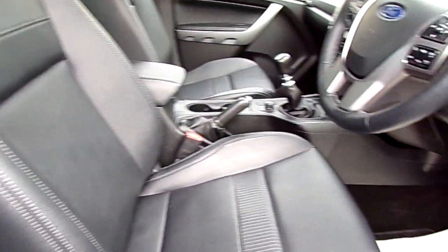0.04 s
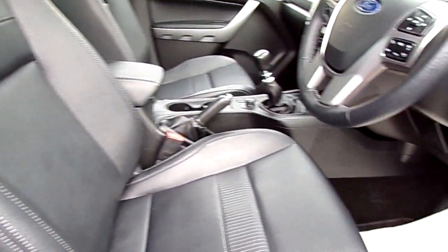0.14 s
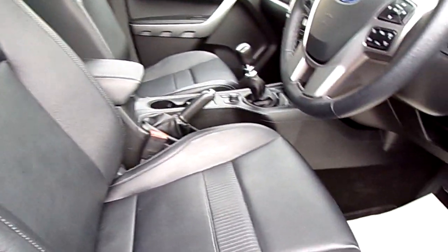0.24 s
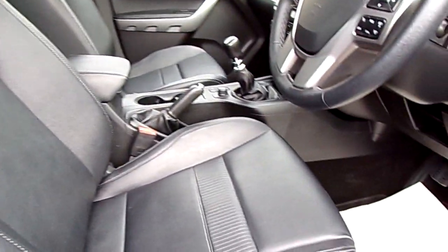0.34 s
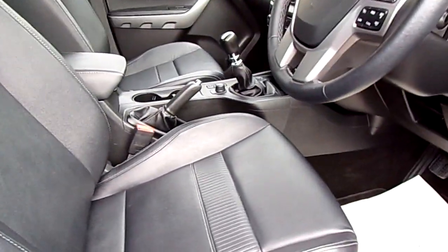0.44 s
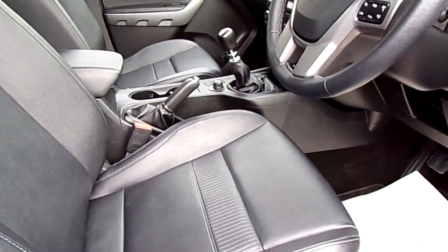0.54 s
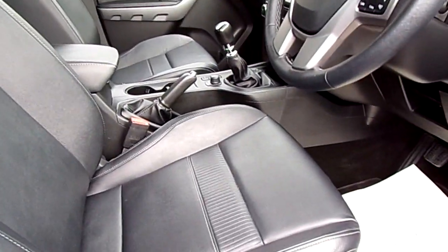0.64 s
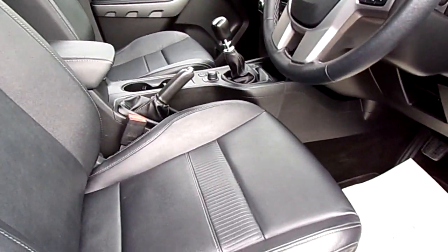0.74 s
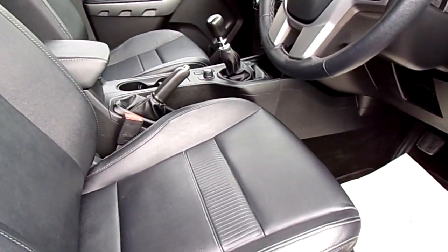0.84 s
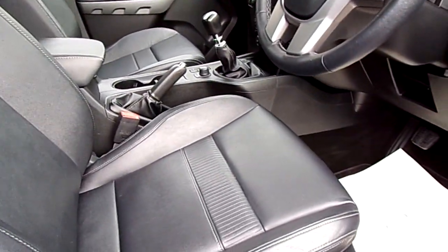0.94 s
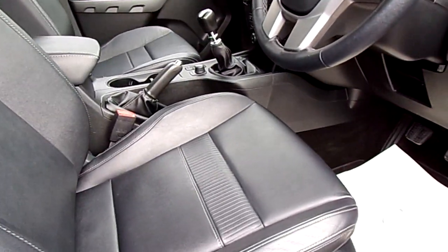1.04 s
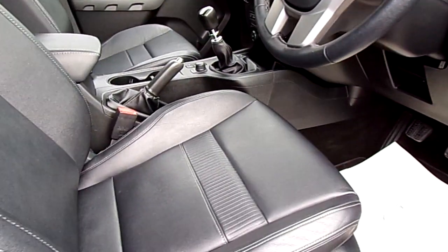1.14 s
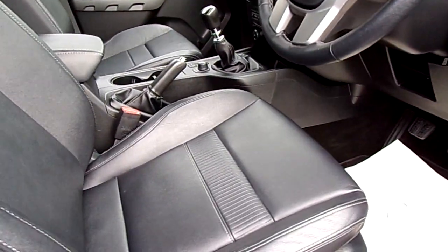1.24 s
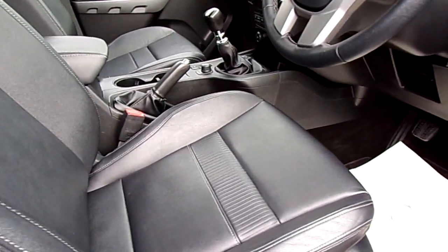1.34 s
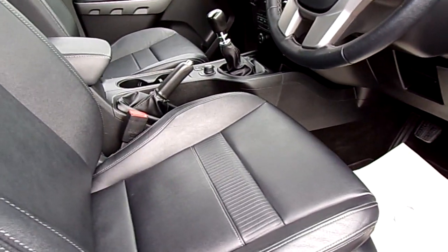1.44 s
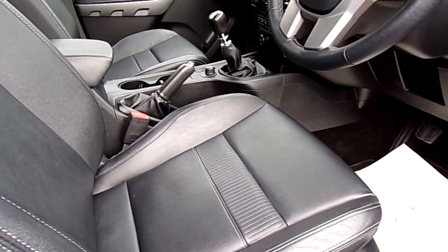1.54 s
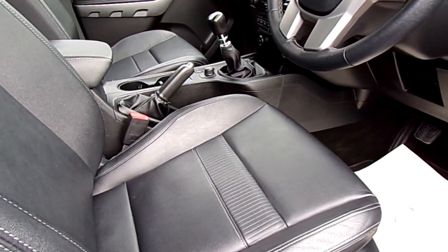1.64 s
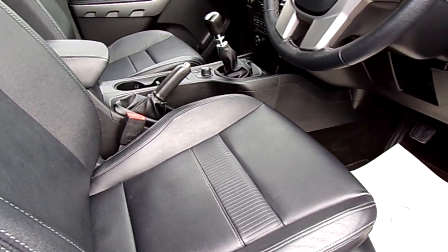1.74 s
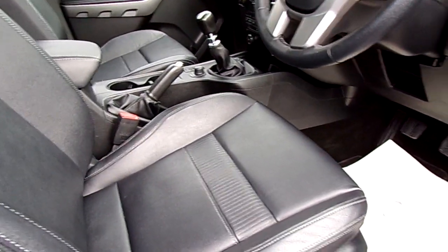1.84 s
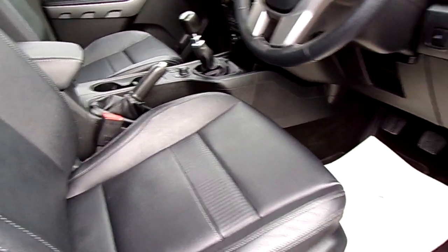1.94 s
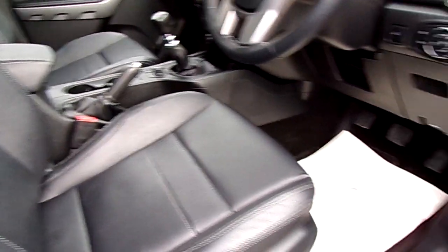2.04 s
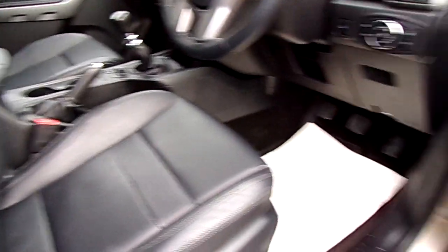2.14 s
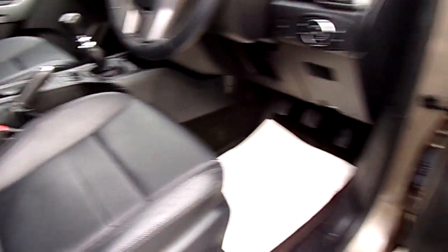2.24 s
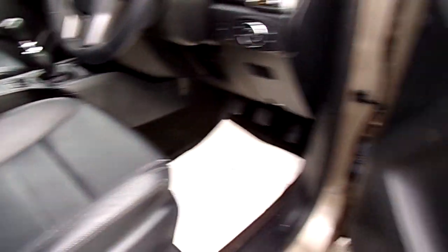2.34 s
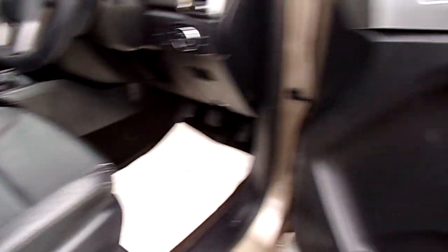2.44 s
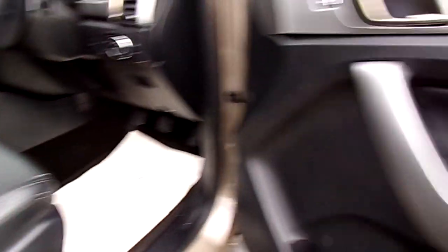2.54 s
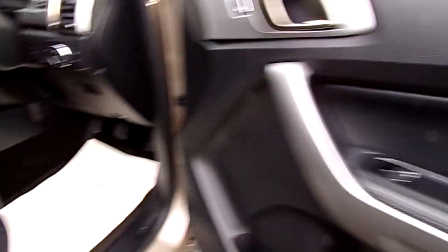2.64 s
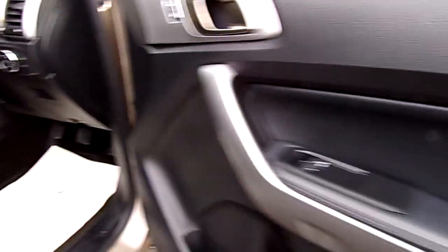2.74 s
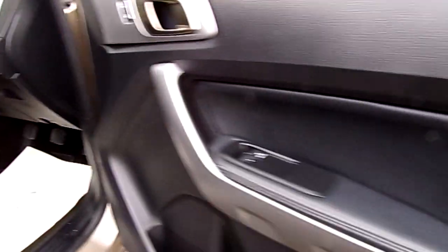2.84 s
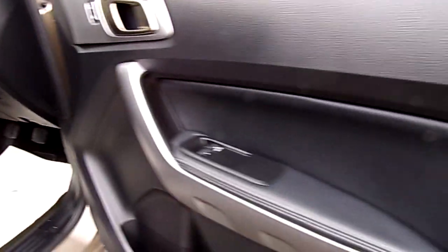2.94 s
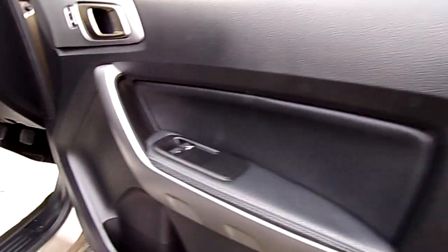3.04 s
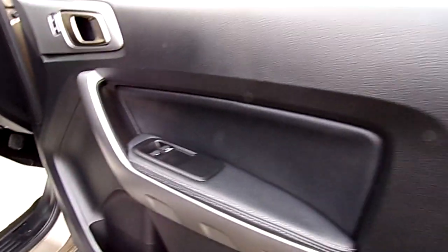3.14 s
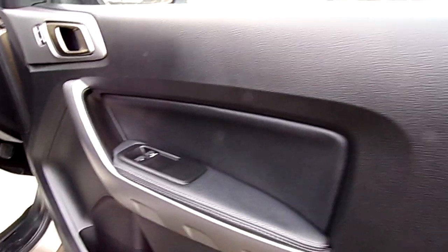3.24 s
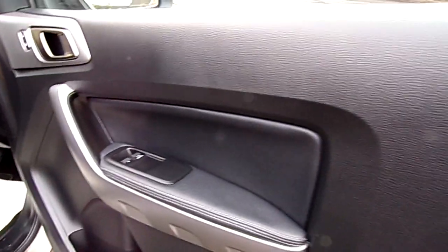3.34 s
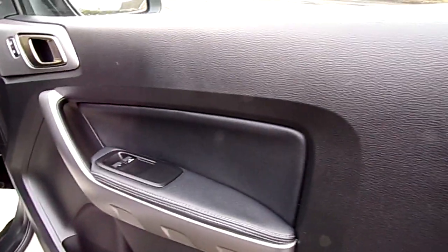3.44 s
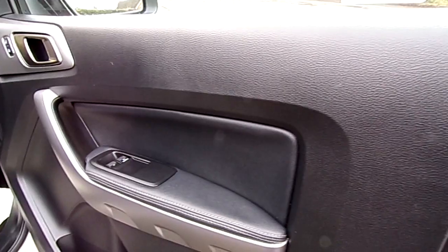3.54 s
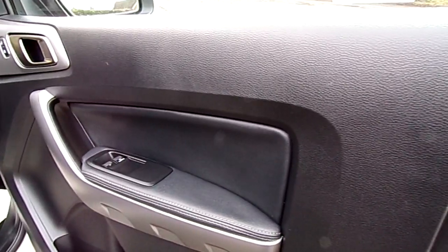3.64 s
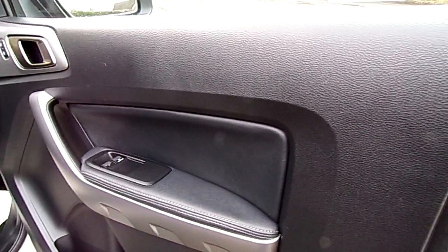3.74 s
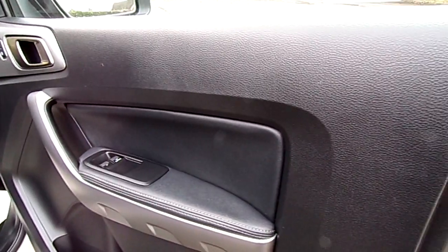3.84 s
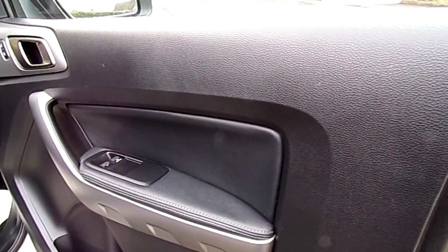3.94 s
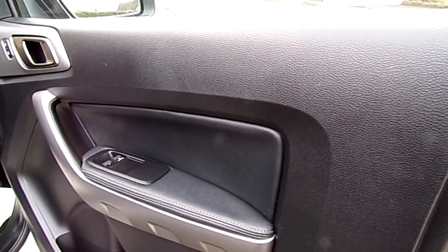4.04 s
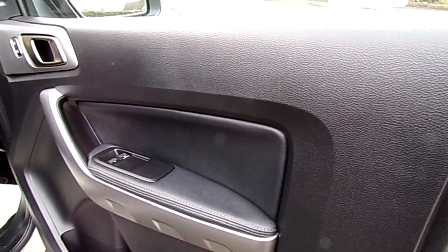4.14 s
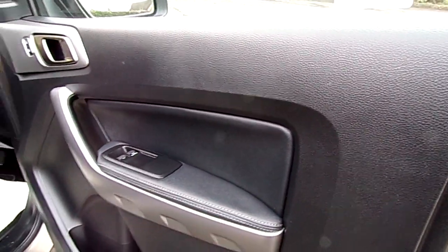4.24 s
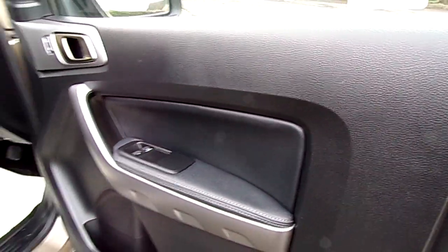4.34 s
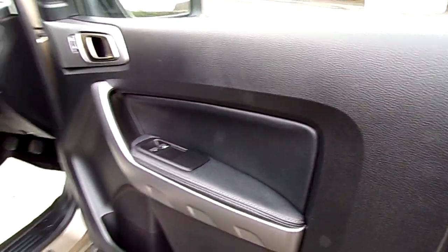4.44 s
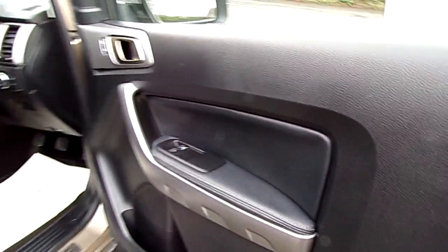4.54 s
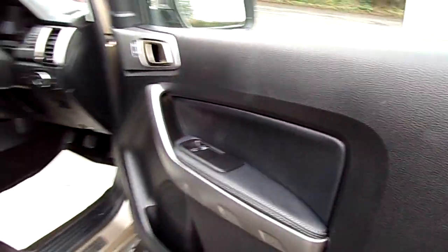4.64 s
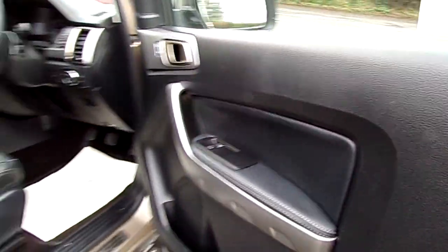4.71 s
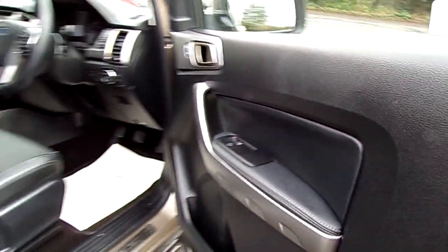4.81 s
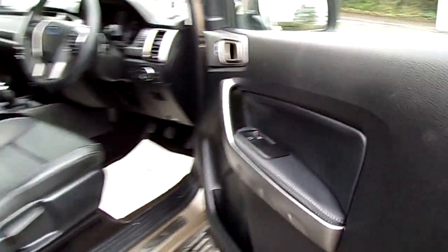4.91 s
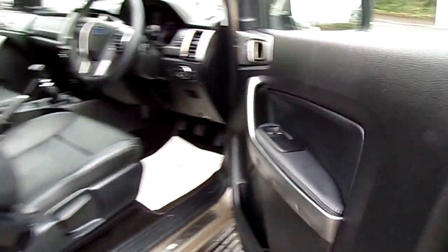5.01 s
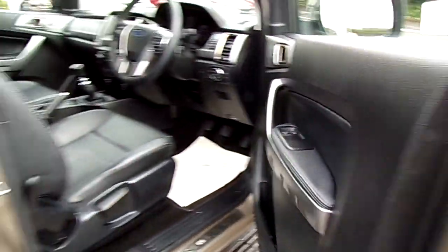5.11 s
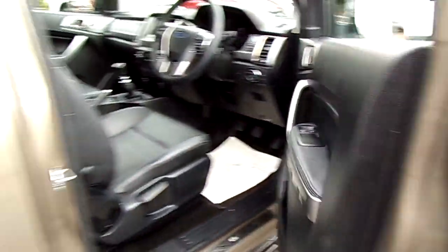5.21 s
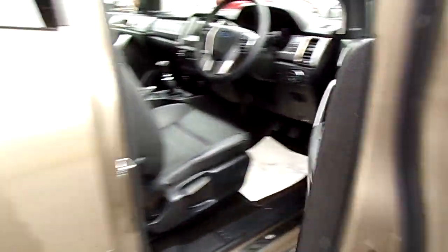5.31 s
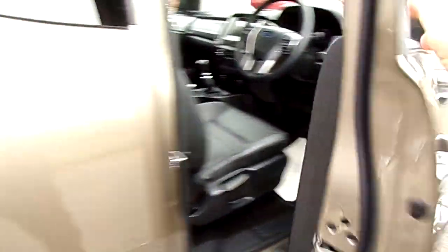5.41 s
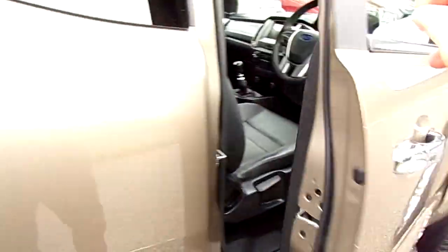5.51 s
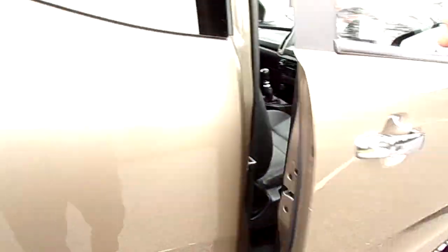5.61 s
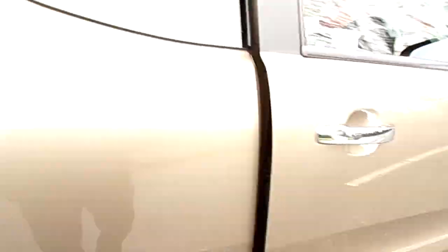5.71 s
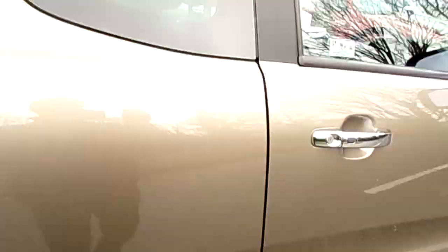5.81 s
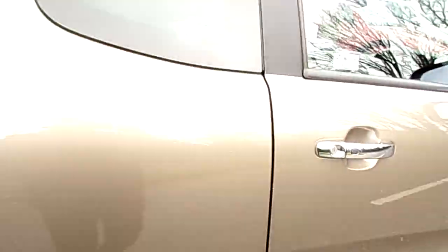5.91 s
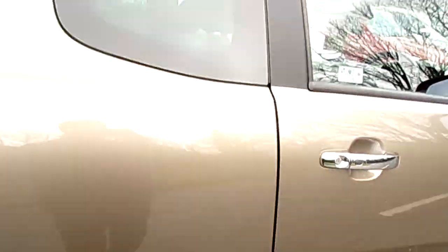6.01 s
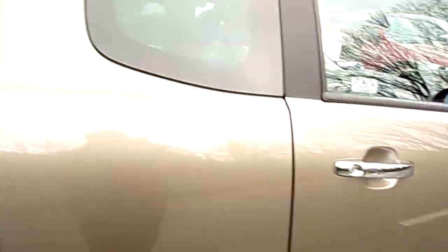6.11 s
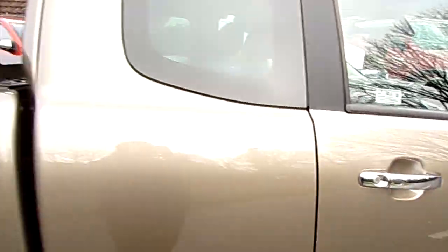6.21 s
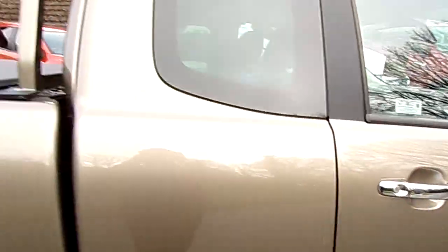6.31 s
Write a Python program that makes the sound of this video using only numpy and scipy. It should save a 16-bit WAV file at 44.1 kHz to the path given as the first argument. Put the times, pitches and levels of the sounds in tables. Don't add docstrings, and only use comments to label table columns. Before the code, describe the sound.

Heavy vehicle door slam with rattling trim, quiet open lot, small ticks and distant birds, an approaching car's rushing roar, another tighter slam near the end.

```python
import sys
import numpy as np
from scipy import signal
from scipy.fft import rfft, irfft, next_fast_len
from scipy.io import wavfile
from scipy.ndimage import uniform_filter1d

SR = 44100
rng = np.random.default_rng(int(sys.argv[2]) if len(sys.argv) > 2 else 0)


def how_loud(loudness_db):
    steps = np.asarray(loudness_db, float) / 20
    return 10 ** steps


def wav_record(signal):
    frames = np.transpose(np.atleast_2d(signal))
    bounded = np.clip(frames, -1, 1)
    quanta = np.round(bounded * 32767).astype(np.int16)
    wavfile.write(sys.argv[1], SR, quanta)


N = 280917
BINS = np.fft.rfftfreq(512, 1 / SR)
FRAMES = np.arange(N // 128 + 6) * 128 / SR

# pitch_hz, level_db (per Hz)
LOT_SPECTRUM = [(25, -29.5), (60, -7), (145, 1), (220, -4), (430, -13.5), (585, -10), (655, -15.5),
                (760, -9), (975, -9), (1170, -12.5), (2490, -14.5), (2860, -15), (4000, -16.5),
                (6000, -40.5)]
# pitch_hz, level_db (rms)
MACHINE_HUM = [(59.2, -72)]
# pitch_hz, level_db
HEDGE_SPECTRUM = [(3000, -31), (4300, 0), (5500, 1), (6500, 2.5), (7500, -4.5), (10000, -8.5), (13000, -28)]
# middle_s, length_s, level_db
HEDGE_GUSTS = [
    (.25, 0.58, -59),
    (1.11, 0.42, -59),
    (1.88, 0.89, -65),
    (2.78, 0.91, -58),
    (4.0, 0.63, -60.5),
    (5.25, 0.42, -59),
    (5.9, 2, -58.5),
]
# centre_hz, width_hz, depth_db
PORT_DIPS = [(3682, 95, 28), (4378, 180, 28), (8045, 210, 27), (11720, 330, 20)]
# pitch_hz, level_db
PORT_ROLL_OFF = [(6800, 0), (7300, -8), (7800, -15), (9200, -12.5), (11000, -25.5), (16000, -35)]
# pitch_hz, delay_ms
BASS_LAG = [(300, 3.99), (1000, 3.3), (2000, 2.83), (3500, 0.29), (6000, 0.051)]
# pitch_hz, level_db
HISS_SPECTRUM = [(7000, -2.5), (9000, -18), (11000, -15), (13000, -8), (15700, -2)]
# middle_s, length_s, level_db, extra_band_db
HISS_SWELLS = [(.2, .9, 3.5, 6), (1.55, 1.4, 3, -1), (2.95, 1.3, 3, 5), (4.15, .8, 3, 0),
               (5.55, 1.1, 3.5, 8)]
# start_s, length_s, level_db, low_share_db
RUBS = [(0.035, 0.057, -57, 9), (0.861, 0.065, -52, 0.5), (0.919, 0.059, -54, -9), (1.015, 0.02, -53, -3),
        (1.035, .062, -47, -5), (1.142, .04, -53, 1), (1.172, .065, -48.5, -3), (1.266, 0.072, -53.5, -5),
        (1.568, 0.048, -59, -10), (1.95, 0.13, -54, -0.5), (3.149, 0.03, -51.5, 8.5),
        (3.174, 0.05, -54, 7.5), (3.331, 0.024, -56, 4), (5.295, .05, -55, 8), (5.37, .03, -59, 6),
        (5.875, .016, -46, -8), (5.886, 0.048, -38.5, -8.5), (5.934, 0.09, -49, 3.5), (6.03, 0.13, -62, -3),
        (6.315, 0.025, -55, -7), (6.335, .022, -49.5, 16.5), (6.357, .012, -51, -9)]
# pitch_hz, level_db
CLOTH_BRIGHT = [(2500, -20.5), (4700, -3), (6400, 17.5), (9000, -2), (14000, -39)]
# pitch_hz, level_db
CLOTH_DULL = [(500, -6), (1500, -16), (2500, -5.5), (3300, -7.5), (4500, -6.5), (7000, -30)]
# start_s, pitch_hz, peak_db, t60_s
FIRST_SLAM_KNOCKS = [(.0695, 393, -13.5, 0.062), (.072, 612, -12.5, 0.064), (.071, 980, -21, .05),
                     (.073, 1760, -24, .035), (.074, 1360, -30, .04), (.078, 250, -21, .08),
                     (.098, 971, -10, .035), (.098, 1243, -13, .035), (.111, 261, -13.5, .08),
                     (.134, 318.5, -14, .05), (.142, 125, -12, 0.096), (.178, 124.5, -14.5, .13),
                     (.188, 835, -20.5, .035), (.225, 385, -33, .05), (.222, 600, -35, .04),
                     (.222, 800, -35, .07), (.2, 760, -29, .05), (.247, 750, -39, .06),
                     (.27, 880, -44, .06), (.272, 600, -44, .06), (.295, 600, -45, .06),
                     (.3, 860, -48, .05), (.155, 1500, -29, .06), (.192, 1290, -36, .06),
                     (.272, 1500, -49, .05), (.137, 340, -13.5, .05), (.157, 400, -21.5, .06),
                     (.174, 380, -24.5, .05), (.216, 90, -26, .1), (.275, 85, -30, .14),
                     (.078, 165, -28, .04), (.101, 150, -19, .04), (.222, 1450, -45, .06),
                     (.252, 2700, -43, .02), (.253, 5500, -50, .015), (.096, 369, -6, 0.046),
                     (.123, 605, -15, .045), (.152, 600, -17, 0.065), (.178, 618, -18.5, 0.083),
                     (.225, 141, -21.5, .07), (.27, 130, -32, .06), (.303, 140, -38, .08),
                     (.118, 2510, -12.5, .02), (.111, 5640, -17.5, .012), (.144, 6000, -23, .008)]
# start_s, pitch_hz, peak_db, t60_s
SECOND_SLAM_KNOCKS = [(5.679, 155, -4, .045), (5.682, 762, 2, .034), (5.683, 620, -8, .045),
                      (5.692, 400, -15, .025), (5.732, 90, -23, .1), (5.762, 80, -29, .05),
                      (5.8, 85, -36, .15), (5.722, 1050, -25, .025), (5.772, 645, -27, .06),
                      (5.772, 800, -36, .05), (5.802, 620, -37, .05), (5.802, 800, -40, .03),
                      (5.812, 1350, -38, .03), (5.812, 1050, -40, .04), (5.7305, 14300, -30, .03),
                      (5.729, 9900, -42, .018), (5.774, 8700, -52, .02), (5.693, 262, -13, 0.047),
                      (5.714, 178, -11, .055), (5.730, 625, -17, 0.047), (5.741, 140, -11, 0.055),
                      (5.748, 278, -20, 0.054), (5.765, 200, -18, 0.068), (5.76, 630, -27, .045),
                      (5.81, 128, -24, 0.064), (5.795, 300, -27, 0.074), (5.676, 1080, -7, .025),
                      (5.674, 1500, -10, .02), (5.703, 1300, -22, .04), (5.753, 1280, -36, .03),
                      (5.682, 990, -5, .028), (5.677, 4000, -15, .02), (5.695, 1240, -18, .04),
                      (5.71, 620, -20, .03), (5.722, 1300, -27, .04), (5.7375, 3530, -26, .025),
                      (5.7385, 3720, -29, .02), (5.7375, 6500, -34, .02), (5.740, 6250, -38, 0.018),
                      (5.691, 5600, -13.5, 0.013)]
# start_s, blow_db, brightness_hz, contact_ms
FIRST_CONTACTS = [(.0708, -5.5, 620, 7.6), (.0765, -16, 2400, 7.7), (.0955, -17, 6500, 2.5),
                  (.0983, 8, 3000, 2.56), (.103, -3, 2200, 2.7), (.110, -11, 6040, 4.5),
                  (.118, -6, 4500, 5.6), (.131, -17, 6500, 4.9), (.144, -15, 6500, 3.5),
                  (.153, -21.5, 5040, 12), (.179, -19.5, 3480, 8.7), (.191, -23.5, 3970, 6.7),
                  (.251, -39, 5000, 12)]
# start_s, blow_db, brightness_hz, contact_ms
SECOND_CONTACTS = [
    (5.669, -25, 3000, 9.7),
    (5.6756, 4, 3030, 4.9),
    (5.681, -2, 1600, 4.8),
    (5.684, 1, 5500, 3.2),
    (5.691, -3, 5070, 4.5),
    (5.710, -18.5, 3200, 11),
    (5.738, -23.5, 4500, 12),
    (5.773, -33.5, 5460, 17),
]
# pitch_hz, peak_db, t60_s, late_ms (after the main blow)
FIRST_PANEL_MODES = [(34.8, -22, 0.53, 5), (88.9, -26, 0.54, 13), (105.6, -27, 0.46, 12),
                     (124, -20.5, 0.41, 10.3), (150.5, -15, 0.27, 8.3), (222.3, -13.5, 0.29, 3.2),
                     (288.6, -16.5, .19, 3.3), (355.7, -16.5, 0.18, .1), (392.4, -17, 0.17, .1),
                     (618, -16.5, 0.3, .1), (640, -19.5, 0.24, .1), (800, -29, 0.42, .1),
                     (1023, -20, 0.14, .1), (1460, -23.5, 0.17, .1)]
# pitch_hz, peak_db, t60_s, late_ms
SECOND_PANEL_MODES = [(48, -18.5, .22, 5.5), (76, -11, 0.13, 6), (135.8, -28, 0.3, 4.4),
                      (175, -22, 0.33, 2.3), (250, -3, .065, .1), (295.5, 3.5, 0.067, .1),
                      (393, -24, 0.11, .1), (584, -29, 0.15, 2.7), (634.5, -18, .16, 2.95),
                      (760, -32, 0.2, 12), (980, -15, 0.15, .1), (1255, -15, 0.15, 3.14)]
# pitch_hz, level_db
FIRST_SHEET_RING = [(60, -46.5), (200, -16), (330, -11), (480, -30), (620, -3), (1000, -9.5), (2700, -14.5),
                    (4400, -20), (7000, -14), (9000, -50)]
# pitch_hz, level_db
SECOND_SHEET_RING = [(60, -42.5), (160, -11.5), (300, -8), (370, -22), (480, -24), (640, -4), (730, -22),
                     (880, -18), (1500, -16.5), (7000, -18), (9000, -54)]
# pitch_hz, t60_s
SHEET_DECAY = [(60, 0.69), (300, 0.43), (1000, 0.13), (3000, 0.16), (7000, 0.15)]
# pitch_hz, level_db (per Hz)
TYRE_SPECTRUM = [(30, -42), (70, -19), (125, -11), (190, -16), (350, -10.5), (485, -17.5), (609, -3.5),
                 (700, -11), (780, 0), (900, -3), (1040, -3), (1400, -7), (2510, -16), (4440, -25),
                 (7000, -58), (9000, -52)]
# time_s, roar_db, engine_db, engine_hz
APPROACH = [
    (1.5, -57.5, -3, 152),
    (2.2, -53.5, -10, 162),
    (2.8, -49.5, -9.5, 178),
    (3.4, -45, -3.5, 206),
    (4.2, -42, -4, 202),
    (4.9, -38.5, -1, 237),
    (5.3, -38, -4, 274),
    (5.8, -36.5, 3.5, 275),
    (6.37, -38.5, 3.5, 250),
]
# middle_s, length_s, pitch_hz, width_hz, level_db
TREAD_BANDS = [(4.6, 1.5, 775, 24, 3), (3.9, 1.1, 1410, 25, -6), (4.7, .8, 1000, 40, -6),
               (5.0, .5, 325, 12, -8), (5.3, .6, 1500, 60, -8)]
# start_s, peak_db, centre_hz, width_octaves
FASTENER_TICKS = [(.878, -21, 6300, 0.2), (.878, -32, 2800, 1.0), (.8775, -31, 9500, .3),
                  (1.164, -39, 8900, .12), (1.168, -41, 9100, .15), (1.186, -44, 9400, .2),
                  (1.197, -44, 9000, .2), (5.889, -30, 6400, .15), (5.951, -36, 6300, .2),
                  (6.348, -27, 3300, .3), (0.8884, -26, 6200, 0.2), (.891, -17, 1460, 2.35),
                  (1.022, -45, 6000, .5), (1.2744, -39, 7000, .6), (2.101, -41.5, 6300, 0.26),
                  (2.181, -38, 6900, 0.49), (2.237, -37, 7000, 0.63), (2.381, -23, 2000, 1.5),
                  (2.3805, -43, 4900, .2), (2.391, -41, 6500, 0.2), (2.8854, -17.5, 1250, 1.7),
                  (3.157, -37, 2980, 0.19), (3.19, -38, 3000, .25), (3.198, -39, 2400, 0.091),
                  (3.224, -37, 1200, .8), (3.311, -35, 3520, 0.68), (3.38, -21.5, 2660, 0.7),
                  (3.3795, -37, 6300, .2), (6.112, -35, 800, 0.45), (6.3195, -36, 6540, 0.19),
                  (3.152, -37, 2950, .3), (3.1575, -40, 6000, .2), (3.182, -38, 3200, .2),
                  (3.186, -38, 3250, .2), (3.194, -34, 2900, .3), (3.206, -39, 3200, .2),
                  (3.213, -43, 2400, .15), (3.217, -41, 3100, .2), (4.372, -38, 3200, .6),
                  (2.516, -38, 600, 1.2)]
# start_s, length_s, from_hz, to_hz, level_db
BIRD_SLIDES = [(2.795, .03, 7050, 6950, -63), (4.69, .024, 7700, 6400, -57),
               (4.705, .06, 7450, 6300, -54.5), (4.898, .05, 7400, 5150, -47),
               (2.966, .014, 5600, 5250, -53), (5.055, .015, 5650, 5300, -56),
               (5.192, .012, 5550, 5100, -52)]
# late_s, level_db
SLIDE_ECHOES = [
    (.008, -6),
    (.019, -15),
]
# start_s, length_s, from_hz, to_hz, level_db
BIRD_SWOOPS = [(2.917, 0.056, 6250, 5560, -54), (5.0, 0.05, 6300, 5600, -55),
               (2.826, .022, 6900, 6300, -57)]
# start_s, length_s, from_hz, to_hz, level_db
BIRD_HELD = [(2.447, 0.044, 5250, 5560, -60), (2.494, .08, 5540, 5230, -60), (3.04, .055, 5600, 5400, -60),
             (2.965, 0.08, 4500, 4480, -61)]
# start_s, length_s, from_hz, to_hz, level_db
BIRD_LEVEL = [(2.995, .035, 5560, 5680, -59), (3.085, .05, 5450, 5700, -59), (3.248, .055, 3900, 3900, -55),
              (5.057, .06, 5690, 5720, -58), (5.125, .074, 5800, 5500, -48), (5.208, .05, 5650, 5650, -61)]
# start_s, length_s, from_hz, to_hz, level_db
FAR_TWITTER = [(2.665, .03, 7200, 7050, -60), (3.65, .05, 7800, 8000, -63),
               (3.735, .025, 6900, 6600, -62.5), (3.785, .03, 7600, 7150, -58), (3.8, .04, 7050, 7000, -59),
               (3.845, .06, 7050, 7000, -58), (3.91, .07, 7050, 6850, -62), (3.855, .11, 6300, 6350, -66),
               (3.92, .08, 5930, 6070, -65), (3.85, .05, 5550, 5350, -66), (4.02, .07, 5500, 5460, -66),
               (3.85, .08, 10800, 11150, -62), (3.93, .14, 12500, 13000, -62),
               (4.13, .03, 11400, 10600, -64), (4.21, .04, 10500, 11400, -62), (4.02, .06, 7350, 7300, -62),
               (4.095, .05, 7450, 7300, -60), (4.26, .18, 7600, 7600, -73), (4.14, .1, 6300, 6000, -70),
               (4.34, .11, 5500, 5500, -68), (4.05, .04, 11300, 11400, -63), (1.45, .08, 9200, 9000, -78),
               (1.7, .09, 9000, 9300, -76), (1.71, .03, 9700, 9500, -76), (1.88, .07, 9200, 8900, -78),
               (1.96, .09, 9300, 10000, -76), (1.85, .03, 7600, 7200, -68), (4.02, .06, 12600, 13100, -60),
               (3.86, .04, 10600, 10800, -66), (3.95, .03, 11000, 10900, -64), (4.18, .07, 7500, 7450, -64),
               (4.33, .1, 7500, 7550, -65), (4.25, .04, 5950, 5900, -65), (3.98, .05, 7700, 7200, -65),
               (3.84, .03, 10950, 10900, -61), (3.895, .04, 11150, 11050, -57),
               (4.045, .03, 12900, 13000, -54)]


def evened(x):
    return x / np.sqrt(np.mean(x ** 2) + 1e-30)


def read(points, hz):
    f, value = np.transpose(points)
    return np.interp(np.log(hz + 1), np.log(f + 1), value)


def add(mix, start_s, sound):
    part = mix[round(start_s * SR):][:len(sound)]
    part += sound[:len(part)]


def hill(t, middle_s, length_s):
    return np.cos(np.pi * np.clip((t - middle_s) / length_s, -.5, .5))


def coloured(x, gain):
    size = next_fast_len(len(x) + 2048)
    return irfft(rfft(x, size) * gain(np.fft.rfftfreq(size, 1 / SR)), size)[:len(x)]


def noise(field_db, patchy_db=0):
    a, b, patches = rng.standard_normal((3, len(field_db), len(BINS)))
    patches = uniform_filter1d(patches, size=25, axis=0)
    patches = evened(uniform_filter1d(patches, size=5, axis=1))
    z = (a + 1j * b) * how_loud(field_db + patchy_db * patches)
    return signal.istft(z.T, nperseg=512, noverlap=384)[1]


def slow_drift(top_hz):
    rates_hz = np.geomspace(.4, top_hz, num=24)
    return evened(sum(np.sin(2 * np.pi * (f * FRAMES + rng.random())) / np.sqrt(f) for f in rates_hz))


def lot():
    wash = noise(0.283 * slow_drift(5.4)[:, None], patchy_db=1.75)[:N]
    wash = coloured(wash, lambda hz: how_loud(read(LOT_SPECTRUM, hz)))
    t = np.arange(N) / SR
    hum = sum(np.sqrt(2) * how_loud(db) * np.sin(2 * np.pi * hz * t) for hz, db in MACHINE_HUM)
    return how_loud(-51) * evened(wash) + hum


def hedge():
    t, calm_db = np.arange(N) / SR, -64
    power = how_loud(calm_db) ** 2
    for middle_s, length_s, db in HEDGE_GUSTS:
        power = power + (how_loud(db) * hill(t, middle_s, length_s)) ** 2
    wash = noise(np.zeros((len(FRAMES), 1)), patchy_db=1.5)[:N]
    wash = coloured(wash, lambda hz: how_loud(read(HEDGE_SPECTRUM, hz)))
    return evened(wash) * np.sqrt(power)


def port_dips(hz):
    return np.prod([1 - (1 - how_loud(-depth_db)) / (1 + 1j * (hz - f) / width_hz)
                    for f, width_hz, depth_db in PORT_DIPS], axis=0)


def hiss():
    t, white = np.arange(N) / SR, rng.standard_normal(N)
    bump_hz, top_hz, hiss_db = 10800, 15780, -72.5

    def shape(hz):
        return how_loud(read(HISS_SPECTRUM, hz)) * port_dips(hz) * (hz < top_hz)

    bump = coloured(white, lambda hz: shape(hz) * np.exp(-((hz / bump_hz - 1) / .09) ** 2))
    plain = coloured(white, shape)
    hills = [hill(t, middle_s, length_s) for middle_s, length_s, _, _ in HISS_SWELLS]
    all_db, bump_db = np.transpose(HISS_SWELLS)[2:] @ hills
    return how_loud(hiss_db + all_db) * (plain + (how_loud(bump_db) - 1) * bump) / np.std(plain)


def jacket():
    grain = how_loud(2.195 * np.minimum(rng.exponential(1, N), 5)) * rng.standard_normal(N)
    clumps = how_loud(2.1 * evened(uniform_filter1d(rng.standard_normal(N), size=250)))
    bright = evened(coloured(grain, lambda hz: how_loud(read(CLOTH_BRIGHT, hz)))) * clumps
    dull = evened(coloured(grain, lambda hz: how_loud(read(CLOTH_DULL, hz)))) * clumps
    rise, fall, sag_db = 0.22, 0.27, -3.5
    t, out = np.arange(N) / SR, np.zeros(N)
    for start_s, length_s, db, low_db in RUBS:
        at = slice(round(start_s * SR), round((start_s + length_s) * SR))
        u = (t[at] - start_s) / length_s
        hand = np.clip(np.minimum(u / rise, (1 - u) / fall), 0, 1) * how_loud(db + sag_db * u)
        out[at] += hand * (bright[at] + how_loud(low_db) * dull[at])
    return out


def knocks(rows):
    rise_cycles, choke = 1.4, 1.64
    out, t = np.zeros(N), np.arange(SR // 3) / SR
    for start_s, hz, db, t60_s in rows:
        level = how_loud(db - 60 * (t / t60_s) ** choke)
        build = 1 - np.exp(-t * hz / rise_cycles)
        add(out, start_s, level * build * np.sin(2 * np.pi * hz * t))
    return out


def contact_force(contacts):
    force, t = np.zeros(N), np.arange(3000) / SR
    for start_s, db, hz, ms in contacts:
        chatter = rng.standard_normal(len(t)) * np.exp(-1000 * t / ms) * (1 - np.exp(-t * hz / 1.12))
        chatter = signal.sosfilt(signal.butter(N=3, Wn=min(hz, 15000), fs=SR, output="sos"), chatter)
        add(force, start_s, how_loud(db) * chatter * np.sqrt(4000 / hz))
    return force


def door(contacts, modes, sheet, blow_s, sheet_db, direct_db, boom_rise_s, ring):
    force = contact_force(contacts)
    decay_db = 60 * FRAMES[:350, None] / (ring * read(SHEET_DECAY, BINS))
    metal = noise(read(sheet, BINS) - decay_db)[:SR]
    sheet_ring = signal.oaconvolve(force, metal / np.linalg.norm(metal))[:N]
    latch = signal.sosfilt(signal.butter(2, 320, "high", fs=SR, output="sos"), force)
    out = how_loud(sheet_db) * sheet_ring + how_loud(direct_db) * latch
    t = np.arange(SR) / SR
    wobble = evened(uniform_filter1d(rng.standard_normal((len(modes), SR)), size=900, axis=1))
    for (hz, db, t60_s, late_ms), shake in zip(modes, wobble):
        build = 1 - np.exp(-t / (boom_rise_s * 100 / hz + 0.0013))
        level = how_loud(db - 60 * t / t60_s + 1.97 * shake)
        add(out, blow_s + late_ms / 1000, level * np.sin(2 * np.pi * hz * t) * build)
    return out


def top_fizz(start_s, db, t60_s, low_hz):
    out, t = np.zeros(N), np.arange(SR // 4) / SR
    high_pass = signal.butter(N=4, Wn=low_hz, btype="high", fs=SR, output="sos")
    fizz = signal.sosfilt(high_pass, rng.standard_normal(len(t)))
    add(out, start_s, how_loud(db - 60 * t / t60_s) * evened(fizz))
    return out


def vehicle():
    time_s, roar_db, engine_db, engine_hz = np.transpose(APPROACH)
    dip_hz = 385 + 3 * (roar_db + 57)
    steady = noise(.6 * slow_drift(8)[:, None], patchy_db=1.4)[:N]
    hz, t, z = signal.stft(steady, SR, nperseg=2048)
    hz = hz[:, None]
    phase = 2j * np.pi * 0.58 * (hz / np.interp(t, time_s, dip_hz) - 1)
    echo = abs(1 - 0.15 * np.exp(-hz / 2500 + phase))
    engine_shape = np.exp(-((hz - np.interp(t, time_s, engine_hz)) / 28) ** 2)
    engine = how_loud(np.interp(t, time_s, engine_db) + 5) * engine_shape
    rumble_db = 3.3 * (np.interp(t, time_s, roar_db) + 38) - 2
    rumble = how_loud(rumble_db) * np.exp(-(np.log2((hz + 1) / 120) / 0.7) ** 2)
    tread = sum(how_loud(db) * hill(t, middle_s, length_s) * np.exp(-((hz - f) / width_hz) ** 2)
                for middle_s, length_s, f, width_hz, db in TREAD_BANDS)
    z = z * (echo * how_loud(read(TYRE_SPECTRUM, hz)) + engine + rumble + tread)
    passing = evened(signal.istft(z, SR, nperseg=2048)[1][:N])
    t = np.arange(N) / SR
    fade_in = np.clip(t - .7, 0, 1)
    return passing * how_loud(np.interp(t, time_s, roar_db) - 0.86) * fade_in


def ticks():
    out, t, lead_s = np.zeros(N), np.arange(900) / SR, .002
    for start_s, db, hz, octaves in FASTENER_TICKS:
        snap = how_loud(-19 - 1800 * t) * rng.standard_normal(len(t)) * (t > lead_s)
        snap[round(lead_s * SR)] = 1
        snap = coloured(snap, lambda f: np.exp(-(np.log2((f + 1) / hz) / octaves) ** 2))
        add(out, start_s - lead_s, how_loud(db) * snap / abs(snap).max())
    return out


def whistles(rows, bend=1, swell_db=0, arch_hz=0):
    out = np.zeros(N)
    for start_s, length_s, from_hz, to_hz, db in rows:
        drift = evened(uniform_filter1d(rng.standard_normal((2, 9000)), size=260, axis=1))
        waver, flutter = drift[:, :round(length_s * SR)]
        u = np.linspace(0, 1, len(waver))
        hz = from_hz + (to_hz - from_hz) * u ** bend + arch_hz * np.sin(np.pi * u)
        tone = np.sin(2 * np.pi * np.cumsum(hz + 24 * waver) / SR)
        level = how_loud(db - swell_db * (1 - u) + 2.5 * flutter)
        add(out, start_s, how_loud(2.0) * level * tone * signal.windows.tukey(len(u), .3))
    return out


def birds():
    slides = whistles(BIRD_SLIDES, bend=1.8, swell_db=10)
    out = slides + sum(how_loud(db) * np.roll(slides, round(late_s * SR)) for late_s, db in SLIDE_ECHOES)
    out = out + whistles(BIRD_SWOOPS, bend=0.4, swell_db=4)
    out = out + whistles(BIRD_HELD, arch_hz=190) + whistles(FAR_TWITTER) + whistles(BIRD_LEVEL)
    t = np.arange(8000) / SR
    echoes = rng.standard_normal(len(t)) * how_loud(-60 * t / .4)
    return out + how_loud(-7) * signal.oaconvolve(out, echoes / np.linalg.norm(echoes))[:N]


def air_push(start_s, db, ms):
    out, u = np.zeros(N), np.arange(4000) / SR * 1000 / ms
    add(out, start_s, -how_loud(db) * np.sin(2 * np.pi * u) * u * np.exp(1 - u))
    return out


def scene():
    first_door = door(FIRST_CONTACTS, FIRST_PANEL_MODES, FIRST_SHEET_RING, blow_s=.0975,
                      sheet_db=-6.5, direct_db=4.5, boom_rise_s=0.031, ring=1.0)
    second_door = door(SECOND_CONTACTS, SECOND_PANEL_MODES, SECOND_SHEET_RING, blow_s=5.6725,
                       sheet_db=-9.0, direct_db=4.0, boom_rise_s=0.0046, ring=0.76)
    second_door += air_push(5.670, db=-3.0, ms=6.54)
    slam_knocks = knocks(FIRST_SLAM_KNOCKS) + knocks(SECOND_SLAM_KNOCKS)
    mix = first_door + second_door + slam_knocks
    mix += lot() + hedge() + vehicle() + jacket() + ticks() + birds()
    mix += top_fizz(.099, db=-27, t60_s=.25, low_hz=11000)
    mix += top_fizz(5.676, db=-13, t60_s=.035, low_hz=5000)
    return mix[None]


def low_pass(x):
    return signal.sosfilt(signal.butter(12, 15770, fs=SR, output="sos"), x)


def record(dry):
    def ports(hz):
        late_cycles = np.cumsum(read(BASS_LAG, hz)) * hz[1] / 1000
        return how_loud(read(PORT_ROLL_OFF, hz)) * port_dips(hz) * np.exp(-2j * np.pi * late_cycles)

    heard = coloured(dry[0], ports) + hiss()
    mix = np.clip(heard, -1, 1)[None]
    return low_pass(mix)


dry = scene()
out = record(dry)
wav_record(out)
```